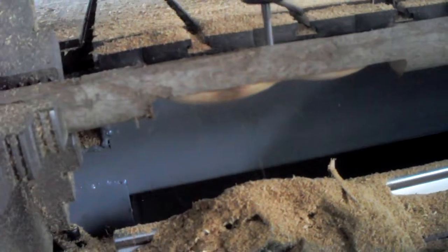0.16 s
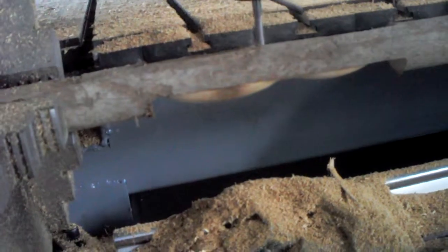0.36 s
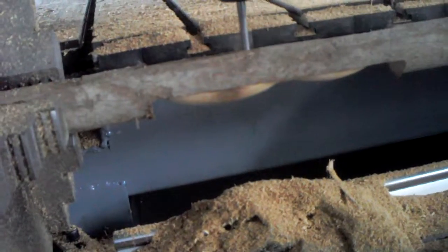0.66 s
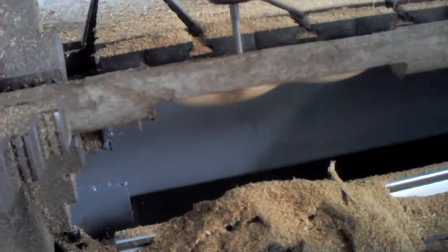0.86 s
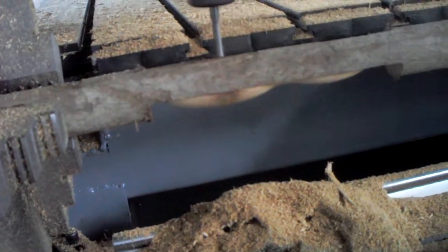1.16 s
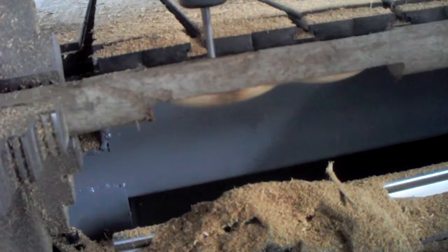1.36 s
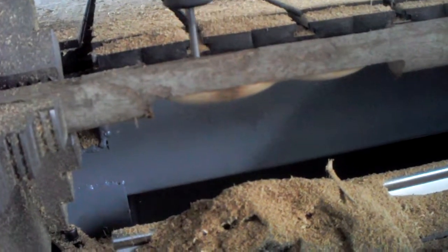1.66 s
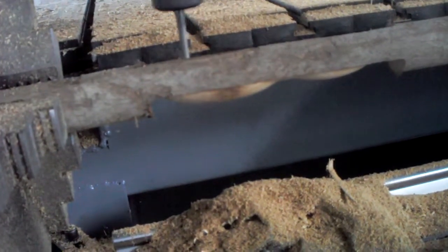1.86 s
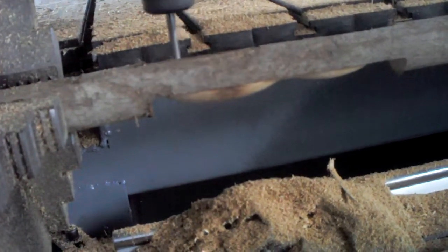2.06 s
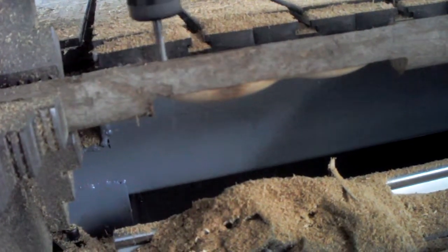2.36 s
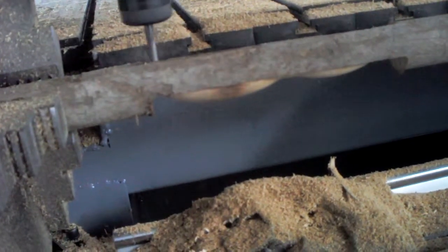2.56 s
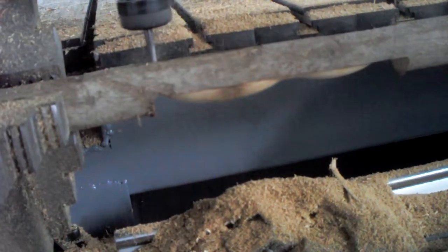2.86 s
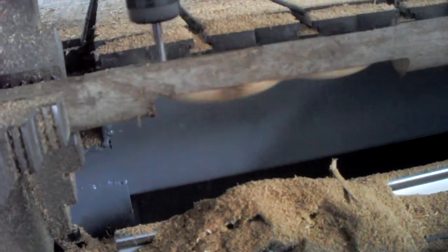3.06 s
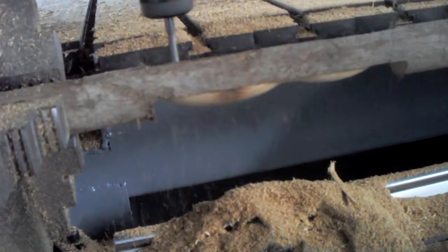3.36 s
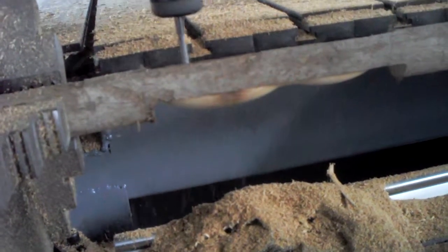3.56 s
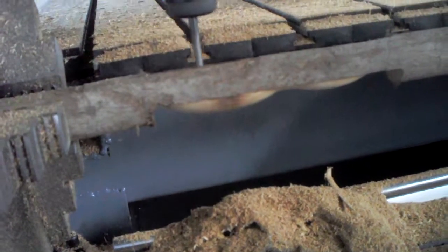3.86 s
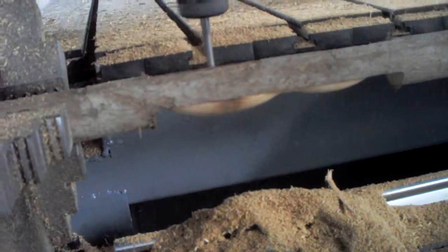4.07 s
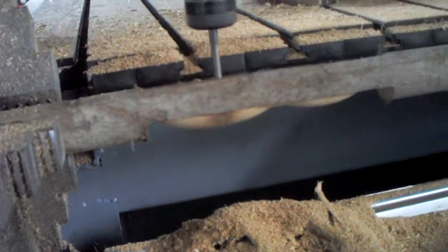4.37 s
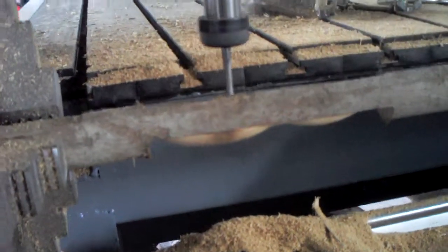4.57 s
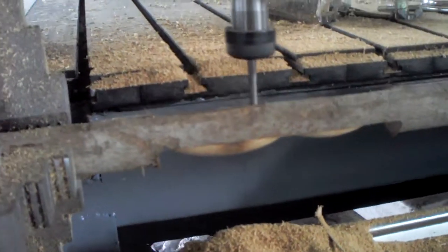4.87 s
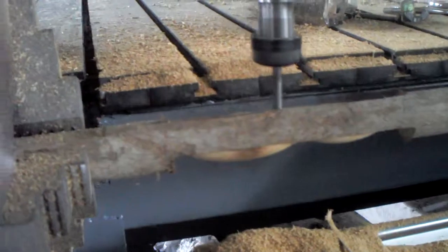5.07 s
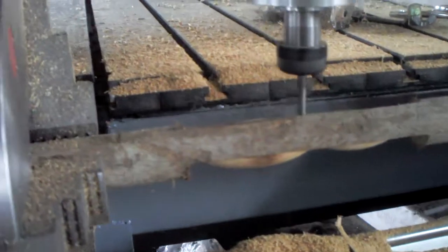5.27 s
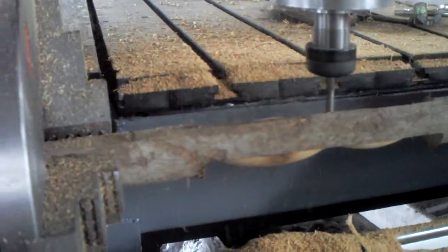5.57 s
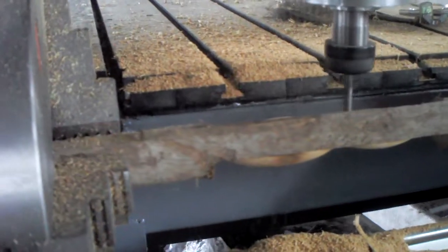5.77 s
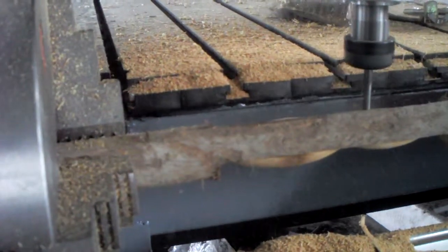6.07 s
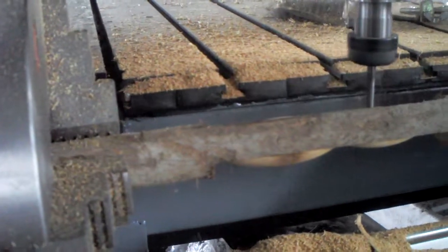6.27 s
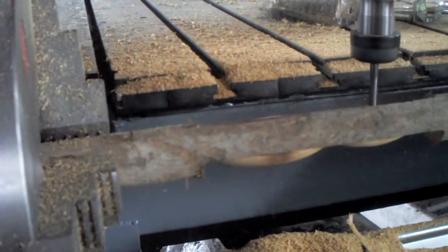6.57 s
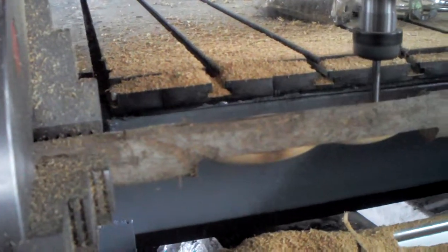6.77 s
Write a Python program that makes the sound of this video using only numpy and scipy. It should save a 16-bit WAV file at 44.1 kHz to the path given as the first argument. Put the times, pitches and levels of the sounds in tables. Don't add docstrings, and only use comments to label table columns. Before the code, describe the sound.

Very close to a cutting machine in a workshop, a fast spindle whines without pause. Its thin bit rings loudly and shrilly in wood, flickering with tiny slips, then squeals harder and breaks up roughly near the middle. The squeal fades to a buzzy whine with a soft puff of air, returns briefly, then gives way to pulsing rasp and hiss. Small ticks; the loudest moments sound overloaded.

```python
import sys
import numpy as np
from scipy import signal
from scipy.io import wavfile
from scipy.ndimage import uniform_filter1d, minimum_filter1d

SR = 44100
rng = np.random.default_rng(int(sys.argv[2]) if len(sys.argv) > 2 else 0)


def volts_from_db(level):
    exponent = np.asarray(level, float) / 20
    return 10 ** exponent


def wav_out(sig):
    wavfile.write(sys.argv[1], SR, np.round(np.clip(np.atleast_2d(sig).T, -1, 1) * 32767).astype(np.int16))


N = 305172


def clock():
    return np.arange(N) / SR


def evened(x):
    return x / np.sqrt(np.mean(abs(x) ** 2) + 1e-20)


def curves(rows, t=None):
    s, *columns = np.transpose(rows)
    t = clock() if t is None else t
    return [np.interp(t, s, column) for column in columns]


def read(points, hz):
    f, value = np.transpose(points)
    return np.interp(np.log(hz + 1), np.log(f + 1), value)


def swells(rows, t, flat=1):
    total = 0
    for middle, length, top in rows:
        bump = np.cos(np.pi * np.clip((t - middle) / length, -.5, .5)) ** 2
        total = total + top * np.minimum(flat * bump, 1)
    return total


def swells_db(rows, t, rest_db, flat=1):
    linear = [(middle, length, volts_from_db(db)) for middle, length, db in rows]
    return 20 * np.log10(volts_from_db(rest_db) + swells(linear, t, flat))


def spin(hz):
    return np.exp(2j * np.pi * np.cumsum(hz * np.ones(N)) / SR)


def flutter(width_hz):
    r = np.exp(-np.pi * width_hz / SR)
    z = rng.standard_normal(N) + 1j * rng.standard_normal(N)
    return evened(signal.lfilter([1], [1, -2 * r, r * r], z))


def noise(level_db, patchy_db):
    frames, hz = N // 128 + 5, np.fft.rfftfreq(512, 1 / SR)
    a, b, patches = rng.standard_normal((frames, 257, 3)).T
    patches = uniform_filter1d(uniform_filter1d(patches, size=6, axis=0), size=16, axis=1)
    field = level_db(hz[:, None], np.arange(frames) * 128 / SR) + patchy_db * evened(patches)
    wave = signal.istft((a + 1j * b) * volts_from_db(field), nperseg=512, noverlap=384)[1]
    return np.sqrt(SR / 512) * wave[:N]


def chopped(x, turn, levels_db, orders):
    circle = np.linspace(-np.pi, np.pi, num=8193)
    pattern = 0
    for m, db in zip(orders, levels_db):
        pattern = pattern + volts_from_db(db) * np.exp(1j * m * circle + 2j * np.pi * rng.random())
    return x * np.interp(np.angle(turn), circle, pattern)


# time of least grip in seconds, depth in dB, loosening in seconds,
# catching in seconds.
SLIPS = [(.09, -8, 0.056, 0.046), (.115, -9, .008, .008), (.175, -15, 0.011, 0.026),
         (0.255, -12, 0.0071, 0.027), (.285, -15, 0.03, .001), (.313, -6, .008, 0.056),
         (.341, -13, 0.039, 0.016), (.386, -10, 0.012, 0.032), (.44, -6, .012, .012),
         (.534, -12, .075, 0.081), (.659, -12, 0.047, 0.014), (.7, -5, .05, 0.069),
         (.776, -18, 0.022, 0.013), (.897, -9, .014, .014), (.953, -5, 0.033, 0.027),
         (1.305, -12, .01, .008), (1.335, -7, 0.014, 0.015), (1.4, -9, 0.027, 0.038),
         (1.465, -9, 0.037, 0.067), (1.546, -11, 0.013, 0.053), (1.626, -10, 0.015, 0.039),
         (1.771, -13.5, 0.11, 0.035), (1.826, -9, 0.027, 0.043), (1.891, -15, .015, 0.012),
         (2.201, -6, 0.0091, 0.022), (2.262, -23, 0.023, 0.021), (2.3, -5, 0.02, 0.03),
         (2.37, -14, 0.0083, 0.022), (2.576, -9, 0.017, 0.023), (2.591, -12, .005, 0.005),
         (2.6, -20, 0.0029, 0.0033), (2.661, -4, 0.017, 0.025), (2.698, -9.5, 0.0039, 0.053),
         (2.722, -6, 0.006, 0.017), (3.23, -8.5, 0.071, 0.063), (3.565, -8, 0.014, 0.014),
         (5.705, -5.5, .02, 0.014), (5.765, -5, .015, .02), (5.815, -3, .012, 0.021),
         (5.885, -5, 0.047, 0.033)]


def grip(t, rows=SLIPS):
    coarse = t[::16]
    level_db = 0
    for s, db, loosen, catch in rows:
        level_db = level_db + np.interp(coarse, [s - loosen, s, s + catch], [0, db, 0])
    return volts_from_db(np.interp(t, coarse, level_db))


# time in seconds, turns per second.
SPEED = [(0, 299.72), (2.6, 299.72), (3, 299.88), (3.8, 299.88), (4.2, 299.64), (5, 299.55), (5.4, 299.48),
         (5.7, 299.82), (6.92, 299.78)]


def shaft_turn():
    return spin(curves(SPEED)[0])


# time in seconds, gain in dB.
SHAFT_LEVEL = [(0.0, -8), (0.13, -1.5), (0.229, -6), (0.55, 0.5), (1.17, 0.5), (2.19, 0.5), (2.355, -6.5),
               (2.774, -12), (2.9, -1.5), (3.69, 0.5), (3.83, -1), (4.05, -9), (4.21, -2), (5.38, 0.5),
               (5.5, -4), (5.83, -0.5), (6.49, -0.5), (6.92, 0.5)]
# time in seconds, position among the cuts (0 to 2).
HEAD_PATH = [
    (2.3, 0),
    (2.9, 1),
    (5.4, 1),
    (5.9, 2),
]
# one cut, levels in dB of orders 1, 2, 3 ..
CUT_TONES = [
    (-36.5, -42.5, -41.5, -36.5, -44, -31.5, -39, -39, -44, -34.5, -36.5, -31, -21, -37, -39, -36, -36, -50, -32.5, -46, -25.5, -40, -34.5, -29.5, -69, -80, -56, -55, -60, -48, -56, -63, -33.5, -31.5),
    (-44, -28, -33, -30.5, -43, -28.5, -48, -39.5, -53, -33.5, -60, -31.5, -34.5, -32.5, -46, -55, -41.5, -47, -35.5, -40, -37.5, -38, -43, -36.5, -36, -37, -42, -70, -48, -44, -65, -64, -38.5, -39.5),
    (-39, -20.0, -28, -36.5, -37, -28.5, -36.5, -38, -36.5, -40, -40, -38, -34.5, -33, -32.5, -34, -38, -35, -28, -28, -39, -37, -32.5, -38, -33.5, -36, -47, -49, -52, -43, -45, -55, -40, -45),
]
# middle in seconds, length in seconds,
# shaft order, top in dB.
ORDER_SWELLS = [(0.087, 0.067, 6, -20.5), (0.386, 0.27, 6, -29), (1.636, 0.84, 6, -25.5),
                (3.062, 0.21, 6, -23.5), (3.7, 0.71, 6, -18), (4.6, 1.66, 6, -17), (5.374, 0.1, 6, -26),
                (5.757, 0.55, 6, -24), (6.5, 0.41, 6, -43), (3.102, 0.74, 2, -25), (5.017, 2, 2, -26),
                (.6, .8, 19, -32.5), (2.11, 1.1, 19, -31.5), (2.954, 1.5, 19, -37), (4.502, 0.8, 19, -30.5),
                (6.496, 0.49, 19, -28), (6.95, 0.97, 19, -19), (3.082, 0.3, 14, -27),
                (3.447, 0.51, 14, -26), (3.6, 3.7, 21, -37), (4.797, 2.4, 7, -34.5),
                (4.903, 1.9, 16, -32.5), (4.98, 0.7, 18, -34), (5.828, 0.23, 8, -25), (5.835, 0.21, 9, -27),
                (5.838, 0.21, 16, -40), (6.373, 1, 5, -25.5), (6.62, 0.21, 13, -28),
                (0.53, 1.68, 2, -33), (2.1, 1.02, 2, -36), (-0.5, 0.073, 6, -27), (0.3, 0.5, 9, -32),
                (2, 1.5, 11, -34.5), (2, 1.5, 8, -39.5), (2.14, .25, 18, -26), (2.04, 0.54, 4, -34.5),
                (2.5, 0.68, 6, -39), (3.4, 0.25, 1, -34.5), (3.15, 0.3, 26, -31), (3.72, 0.29, 25, -26),
                (3, .6, 25, -40), (3.72, 0.17, 12, -28), (5.5, 0.99, 3, -29.5), (5.01, 0.9, 4, -30),
                (4.58, 1.05, 17, -30.5), (4.53, 0.54, 10, -34), (5.15, 0.59, 9, -34), (5.84, 0.18, 7, -28),
                (5.85, 1.2, 12, -31.5), (3.77, 0.56, 7, -39), (3.8, .2, 16, -34), (4.25, 0.26, 18, -42),
                (0, 0.84, 18, -34), (.8, .3, 17, -29), (2.5, .7, 15, -42), (3.13, .3, 15, -32),
                (4.62, 1.1, 23, -34), (3.8, .25, 23, -37), (2.803, 0.03, 6, -23.5), (1.7, .11, 11, -25),
                (1.9, .14, 11, -31), (3.04, .12, 16, -34),
                (3.45, 0.48, 13, -20), (3.76, 0.27, 13, -26), (4.47, 1, 13, -26.5), (5.0, 0.39, 13, -27.5),
              (4.8, 0.41, 13, -41), (2.87, 0.13, 14, -29), (3.76, .3, 14, -24), (4.35, 0.28, 14, -29),
              (0.48, 0.17, 14, -31), (6.05, 0.13, 14, -29), (6.7, 0.5, 14, -30), (6.34, 0.19, 17, -27),
              (6.63, 0.23, 17, -24), (6.78, 0.14, 17, -26), (2.98, 0.28, 12, -37), (4.4, 0.67, 12, -33),
              (6.66, .25, 12, -26), (2.28, 0.25, 12, -30), (2.85, 0.36, 15, -34), (3.75, .15, 15, -37),
              (3.1, .2, 16, -33), (5.5, 0.34, 16, -27), (3.8, 0.11, 22, -25), (2.29, 0.059, 8, -25),
              (5.3, 0.3, 11, -27.5), (6.55, 0.64, 18, -31), (6.7, .3, 21, -30), (6.88, 0.083, 11, -31),
              (6.88, 0.05, 13, -23), (5.36, 0.11, 13, -37), (5.83, 0.11, 17, -33), (5.98, 0.052, 17, -36),
              (5.3, 0.56, 19, -33)]
# middle in seconds, length in seconds, shaft order, top in dB.
FLAT_SWELLS = [(1.16, 1.24, 6, -24.5), (3.79, .14, 20, -33), (6.55, .66, 17, -28), (6.56, .36, 7, -30),
               (6.56, .36, 8, -29), (6.56, .36, 9, -27), (6.57, .34, 10, -29), (6.58, .34, 11, -27)]
# middle in seconds, length in seconds, top in dB.
NUT_RATTLES = [(2.74, 0.15, -8), (2.948, 0.34, -15), (5.78, 0.099, -20), (5.86, 0.073, -25),
               (5.997, 0.15, -3.5), (6.113, 0.094, -8), (6.3, 0.11, -7), (6.386, 0.053, -7),
               (6.497, 0.065, -5), (6.61, 0.17, -9), (6.767, 0.11, -4), (6.886, .08, -17)]
DRIVE_HZ = {19: 5696, 21: 6295.6, 24: 7197.3, 33: 9891, 34: 10188}


def spindle(turn):
    step = 64
    t = np.arange(0, N, step) / SR
    shaft_db, place = curves(SHAFT_LEVEL, t)[0], curves(HEAD_PATH, t)[0]
    out, wave = np.zeros(N), np.ones(N, complex)
    for k, tone_db in enumerate(np.transpose(CUT_TONES), start=1):
        wave = wave * turn
        meetings = ORDER_SWELLS
        met = [(s, length, db) for s, length, order, db in meetings if round(order) == k]
        if 16 <= k <= 17:
            met += [(s, length, db - 23.5 - 10 * (17 - k)) for s, length, db in NUT_RATTLES]
        flat_met = [(s, length, db) for s, length, order, db in FLAT_SWELLS if round(order) == k]
        level_db = shaft_db + np.interp(place, range(len(tone_db)), tone_db)
        level_db = swells_db(met, t, level_db, flat=1.09)
        level_db = swells_db(flat_met, t, level_db, flat=5)

        chance = rng.standard_normal((len(t), 2))
        drift = evened(uniform_filter1d(chance, size=120, axis=0))
        quick = evened(uniform_filter1d(chance, size=18, axis=0))
        phase = .25 * drift[:, 1] + np.clip(.35 * k, 3.2, 2 * np.pi) * rng.random()
        gain = volts_from_db(level_db + 1.3 * drift[:, 0] + 1.1 * quick[:, 1]) * np.exp(1j * phase)
        if k == 13:
            gain = gain * volts_from_db(np.interp(t, [2.3, 3.3], [-14, 0]))
        if 8 <= k <= 20:
            gain = gain + volts_from_db(shaft_db - 47.5) * (quick[::-1, 0] + 1j * quick[::-1, 1])
        carrier = spin(DRIVE_HZ[k]) if k in DRIVE_HZ else wave
        out += np.sqrt(2) * (np.repeat(gain, step)[:N] * carrier).real
    top_order = turn ** 40 * volts_from_db(np.interp(clock(), t, shaft_db) - 50)
    return (out + top_order.real) * grip(clock()) ** 0.16


# time in seconds, level in dB.
RING = [(0.0, -18), (.15, -5.5), (.45, -8), (.8, -8.5), (1.0, -13.5), (1.35, -11.5), (1.6, -10),
        (1.94, -11.5), (2.17, -12), (2.28, -10), (2.42, -19)]
# frequency in Hz, width in Hz, level in dB.
RING_MODES = [
    (3930, 79, -7.5),
    (4028, 50, -20.5),
]


def ring(turn):
    t = clock()
    shiver = sum(volts_from_db(db) * spin(hz) * flutter(width) for hz, width, db in RING_MODES)
    motion = turn ** 13 + .44 * evened(shiver)
    slow = np.sqrt(abs(uniform_filter1d(abs(motion) ** 2, size=900)) + 0.15)
    return motion * grip(t) * volts_from_db(curves(RING)[0]) / slow * (t < RING[-1][0])


# time in seconds, level in dB, level of its octave in dB.
SQUEAL = [(2.14, -26, -22), (2.22, -9, -23), (2.554, -6, -43), (2.689, -8, -30), (2.757, -12.5, -36),
          (2.775, -32, -6), (3.09, -24, -2), (3.14, -19, -2), (3.397, -5, -10.5), (3.609, -16, -10),
          (3.796, -21, -2), (3.921, -38, -2), (4.9, -27.5, -4), (5.278, -31, 4), (5.41, -7.5, -4.5),
          (5.62, -9, -4), (5.892, -23.5, -1), (6.2, -35, 0.5)]
# time in seconds, frequency in Hz.
SQUEAL_PITCH = [(2.33, 3982), (2.54, 3995), (2.64, 4018), (2.8, 4090), (3.14, 4065), (3.41, 4008),
                (3.5, 3992), (3.62, 4000), (3.85, 3985), (4.6, 3975), (5.05, 4003), (5.3, 3998),
                (5.41, 4031), (5.57, 4045), (5.84, 4011), (6, 3985)]
# middle in seconds, length in seconds, top in dB.
PEEPS = [(.035, 0.1, -9), (.24, 0.078, -6.5), (1.6, .08, -15), (1.98, 0.069, -10), (2.085, 0.13, -13),
         (2.94, 0.069, -24.5), (5.985, 0.044, -26)]
# middle in seconds, length in seconds, rise in Hz.
BENDS = [
    (2.677, .08, 140),
    (2.745, .08, 80),
]
# time in seconds, share of roughness left.
STEADY = [
    (3.05, 1),
    (3.14, .4),
    (3.64, .4),
    (3.72, 1),
]


def squeal():
    t = clock()
    clean_db, smeared_db = -3.5, -27
    level_db = swells_db(PEEPS, t, curves(SQUEAL)[0])
    weak = np.clip((level_db - clean_db) / (smeared_db - clean_db), 0, 1)
    rough = np.clip(.08 + (0.9 - .08) * weak * curves(STEADY)[0], 0, 1)
    wobble = np.sqrt(1 - rough ** 2) + rough * flutter(88)
    hz = curves(SQUEAL_PITCH)[0] + swells(BENDS, t)
    return volts_from_db(level_db) * grip(t) * spin(hz) * wobble, weak


# levels in dB, one for each of SIDE_ORDERS.
SIDES = [-35, -33, -41, -22, -20.5, -22, -23.5, -31.5, -26.5, -28.5, -30.5, -28, -52, -44, -32]
SIDE_ORDERS = [-9, -4, -3, -2, -1, 1, 2, 3, 4, 6, 8, 10, 11, 12, 13]
OCTAVE_SIDES = [
    [-22, -4, -0.5, -12, -9.5, -20, -20],
    [-27, -1.5, -3, -13, -12.5, -24, -24],
]
# middle in seconds, length in seconds, orders away,
# top in dB.
SIDE_SWELLS = [(2.3, .5, -2, -24), (2.49, 0.34, 2, -20), (3.2, 0.26, -2, -9), (2.9, 0.22, 2, -8),
               (3.44, 0.39, -1, -29), (3.36, .3, 1, -25), (5.55, 0.99, -1, -16), (5.53, 0.39, 2, -17),
               (5.63, 0.23, -2, -25), (5.43, .2, 3, -21), (5.56, .45, 12, -10), (3.42, 0.42, 12, -15)]


def bit(turn):
    t = clock()
    ringing = ring(turn)
    squealing, weak = squeal()
    motion = ringing + squealing
    octave = motion ** 2 / (abs(motion) + 1e-6)

    chop_db = 1 + (9 - 1) * weak
    sides = chopped(volts_from_db(-1.5) * ringing + volts_from_db(chop_db) * squealing, turn, SIDES, SIDE_ORDERS)
    nut_db = np.interp(t, [5.5, 5.58, 5.72, 5.8, 5.92], [-39, -19, -5, -2, -20])
    sides += squealing * turn ** 3 * volts_from_db(nut_db)
    for s, length, m, db in SIDE_SWELLS:
        sides += squealing * turn ** round(m) * swells([(s, length, volts_from_db(db))], t, flat=2.1)
    turn_s = 3.6
    for on, levels_db in zip((t < turn_s, t >= turn_s), OCTAVE_SIDES):
        sides += volts_from_db(curves(SQUEAL)[1]) * chopped(octave * on, turn, levels_db, range(-3, 4))

    burst, gate = break_outs(motion, octave, turn)
    hollowed = motion * (1 - .3 * gate)
    return np.sqrt(2) * (hollowed + sides + burst).real


# time in seconds, depth in dB.
BITE_DEPTH = [(0.0, 2), (.1, 1), (.45, -1), (.8, -1.5), (1.7, 0.5), (2.335, 2), (2.544, -1), (2.7, 2),
              (2.79, -8), (2.93, -3), (3.21, -2.5), (3.33, 1.5), (3.75, -4), (3.98, -6.5), (5.26, -6.5),
              (5.45, 2), (5.9, -5), (6.1, -5), (6.4, -7), (6.92, -3.5)]
# frequency in Hz, step to dB per Hz.
CHIP_BANDS = [
    (2500, -23.5),
    (11000, -28),
]
# frequency in Hz, level in dB.
CHIP_COLOUR = [(20, -30), (150, -8.5), (450, -4.5), (750, 5.5), (1100, 0.5), (2500, 2), (3400, 3.5),
               (4900, 6), (6500, 3.5), (9500, 4.5), (10900, -2), (12200, -14)]
# middle in seconds, length in seconds, fizz in dB.
SPRAYS = [
    (.44, 0.51, -38),
    (6.0, .06, -43),
    (6.77, 0.15, -39.5),
]


def hiss_db(hz, s):
    (body_hz, body_step), (fizz_hz, fizz_step) = CHIP_BANDS
    depth = curves(BITE_DEPTH, s)[0]
    body = -38.5 + depth + body_step
    fizz = swells_db(SPRAYS, s, -38.5 + 1.18 * depth) + fizz_step
    high = read([(body_hz, 0), (fizz_hz, 1)], hz)
    return read(CHIP_COLOUR, hz) + (1 - high) * body + high * fizz


# frequency in Hz, width in Hz, level in dB.
RASP_MODES = [
    (7650, 450, 0),
    (5020, 180, -17),
    (4400, 1500, -25),
]


def rasp_db(hz, s):
    collet_db = -22 + 3.1 * curves(BITE_DEPTH, s)[0]
    nut_db = swells_db(NUT_RATTLES, s, -28)
    shape = 0
    for (f, width, top_db), db in zip(RASP_MODES, (collet_db, nut_db, nut_db)):
        shape = shape + volts_from_db(db + top_db) / (1 + (2 * (hz - f) / width) ** 2)
    return 20 * np.log10(shape) - 27


def chips(turn):
    bite = evened(1 + .12 * turn.real + .2 * (turn ** 2).real)
    cutting = noise(hiss_db, patchy_db=2.3) + noise(rasp_db, patchy_db=1.6)
    return cutting * bite * grip(clock()) ** 0.18


# middle in seconds, length in seconds, top in dB.
FEED_MOVES = [(.1, 0.68, -29), (.52, 0.84, -27), (1.86, 0.44, -21), (2.1, 0.59, -22.5), (3.0, 0.11, -23),
              (3.3, 0.66, -29), (3.65, 0.32, -20.5), (4.94, 0.35, -18), (5.19, 0.24, -18),
              (6.02, 0.21, -23)]


def feed_motor():
    level_db = swells_db(FEED_MOVES, clock(), -36)
    hum = spin(1326) * (0.51 + 0.58 * flutter(44))
    upper = volts_from_db(-7.0) * spin(1662) * flutter(37)
    return np.sqrt(2) * volts_from_db(level_db - 7.0) * (hum + upper).real


# time in seconds, change in dB, coming in
# seconds, going in # seconds.
SURGES = [
    (.27, -3, .015, .015),
    (.335, -3, .02, 0.021),
    (1.69, -3.5, .015, 0.065),
    (2.68, 4, 0.11, .012),
    (2.702, -7, 0.0094, .018),
    (2.745, 5.5, 0.033, .018),
    (2.776, -5.5, 0.013, 0.035),
]


def surge():
    return grip(clock(), SURGES)


# time in seconds, level in dB.
TICKS = [(0.2872, -17), (2.4952, -6), (2.587, -9), (2.741, -12), (3.6955, -15), (5.45, -7), (5.543, -8),
         (5.989, -20), (6.1894, -18), (6.6494, -13), (6.7694, -12)]


def ticks():
    out, t = np.zeros(N), np.arange(200) / SR
    for (s, db), crack in zip(TICKS, rng.standard_normal((len(TICKS), 200))):
        part = out[round(s * SR):][:200]
        part += volts_from_db(db - 60 * t / .012) * np.diff(crack, prepend=0)
    return signal.lfilter(signal.firwin(63, 11500, fs=SR), 1, out)


# middle in seconds, length in seconds, top in dB.
GRUMBLES = [
    (.7, 0.75, -35),
    (1.9, 1, -35),
    (3.15, .4, -35.5),
    (6.0, 0.26, -39),
]


def carriage():
    level_db = swells_db(GRUMBLES, clock(), -45.5)
    return np.sqrt(2) * volts_from_db(level_db) * (spin(720) * flutter(240)).real


# start, full swell, end of hold and end, all in seconds.
BURST_TIMES = [
    (2.636, 2.656, 2.69, 2.699),
    (2.698, 2.738, 2.757, 2.769),
]
# levels in dB from 3 orders below the ring upward,
# then levels in dB from 2 orders below its octave upward.
BURST_SIDES = [
    ([-22, -5, -4, -30, -8, -8, -4, -6], [-14, -17, -10, -9, -14, -8, -16, -22, -18]),
    ([-24, -9, -10, -30, -5, -1, -5, -12], [-11, -16, -8, -13, -15, -10, -17, -24, -22]),
]


def break_outs(motion, octave, turn):
    burst, total_gate = np.zeros(N, complex), np.zeros(N)
    for times, (ring_db, octave_db) in zip(BURST_TIMES, BURST_SIDES):
        gate = np.interp(clock(), times, [0, 1, 1, 0])
        total_gate += gate
        on = gate > 0
        for sway in (1 + .35 * flutter(110), .7 * flutter(45)):
            tones = chopped(motion[on], turn[on], ring_db, range(-3, 5))
            tones = tones + chopped(octave[on], turn[on], octave_db, range(-2, 7))
            burst[on] += sway[on] * gate[on] * tones
    return burst, total_gate


# time in seconds, level in dB.
PUFF = [
    (3.7, -76),
    (3.82, -28.5),
    (3.9, -26.5),
    (4.1, -25.5),
    (4.45, -35.5),
    (4.7, -47),
]
# frequency in Hz, level in dB.
PUFF_COLOUR = [(110, -66), (200, -5.5), (400, 0.5), (800, 2), (1500, -4.5), (3000, -13.5), (6000, -46)]


def puff():
    def puff_db(hz, s):
        return read(PUFF_COLOUR, hz) + curves(PUFF, s)[0] - 25
    return noise(puff_db, patchy_db=1.0)


def scene():
    turn = shaft_turn()
    cutting = bit(turn) + (spindle(turn) + chips(turn)) * surge()
    return (cutting + feed_motor() + carriage() + puff() + ticks())[None]


def band_limit(x):
    return signal.sosfilt(signal.butter(12, 16230, fs=SR, output="sos"), x)


def record(dry):
    top_cut = signal.firwin(127, 12000, window=("kaiser", 10), fs=SR)[None]
    x = signal.oaconvolve(dry, top_cut, "same")
    bright = signal.lfilter(*signal.butter(2, 3000, "high", fs=SR), x)
    overs = np.maximum(abs(bright) - .67, 0)

    peak = uniform_filter1d(-minimum_filter1d(-abs(x), size=60), size=40)
    ceiling, knee = .8, 6.0
    x = x / (1 + (peak / ceiling) ** knee) ** (1 / knee)

    power = abs(uniform_filter1d(x ** 2, size=300))
    white = rng.standard_normal(x.shape)
    low = signal.lfilter(*signal.butter(2, 400, fs=SR), white)
    crackle = volts_from_db(-28.5) * np.tanh(overs / 0.1) * white
    grit = volts_from_db(-6.5) * power ** 0.84 * low
    held = np.clip(x + (crackle + grit), -ceiling, ceiling)
    edge = signal.firwin(255, 15900, fs=SR)[None]
    return band_limit(signal.oaconvolve(held, edge, "same"))


dry = scene()
out = record(dry)
wav_out(out)
```